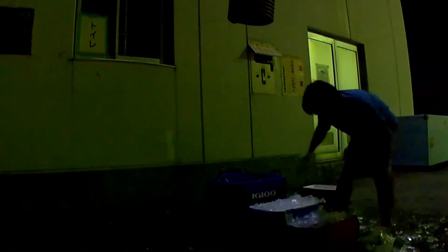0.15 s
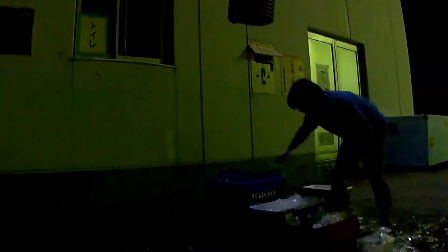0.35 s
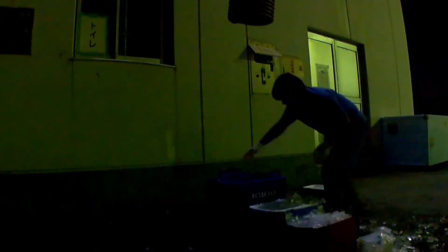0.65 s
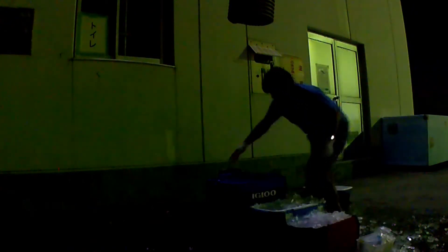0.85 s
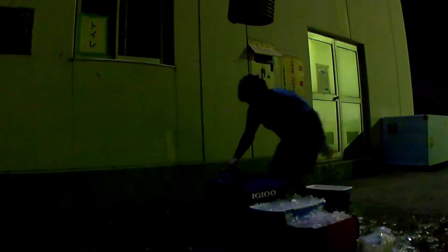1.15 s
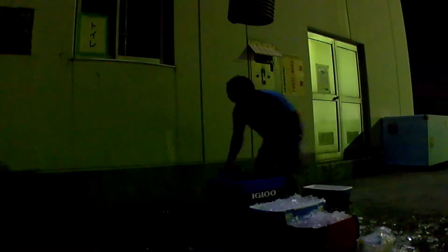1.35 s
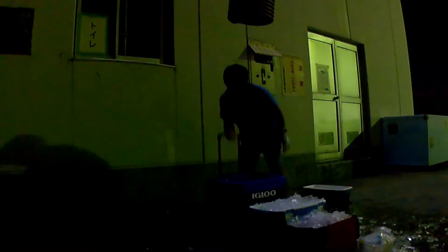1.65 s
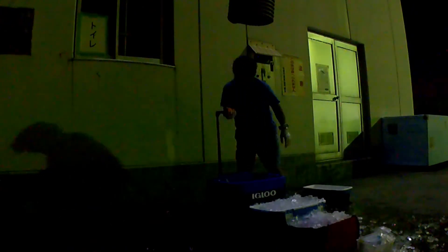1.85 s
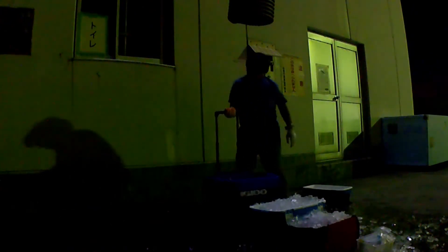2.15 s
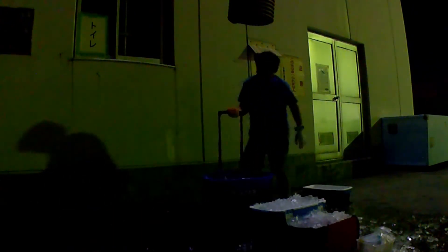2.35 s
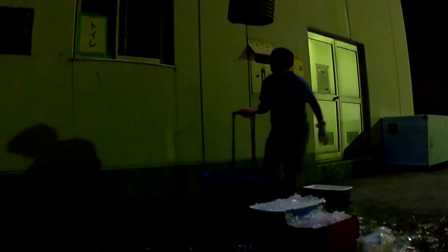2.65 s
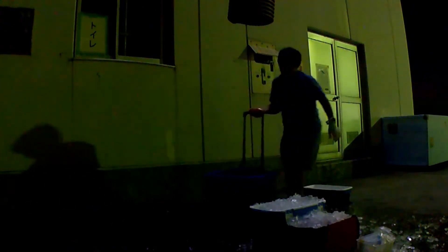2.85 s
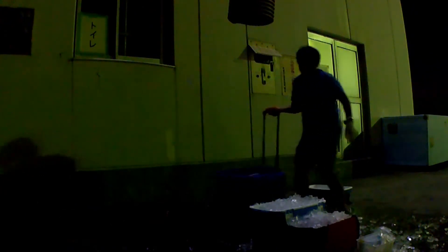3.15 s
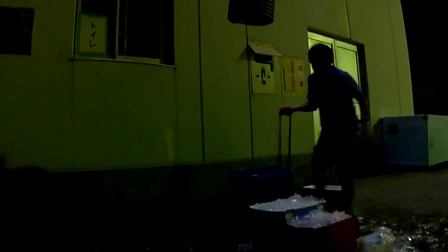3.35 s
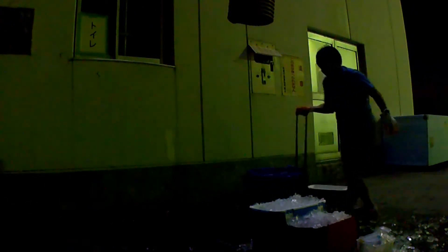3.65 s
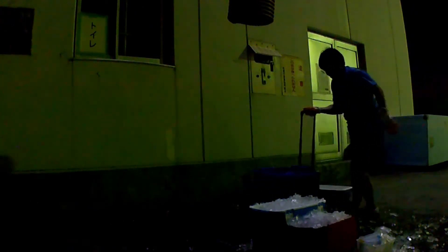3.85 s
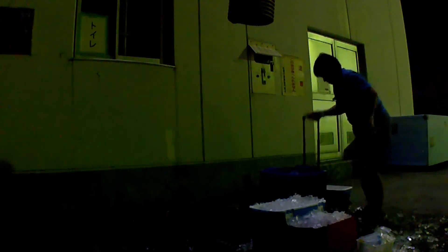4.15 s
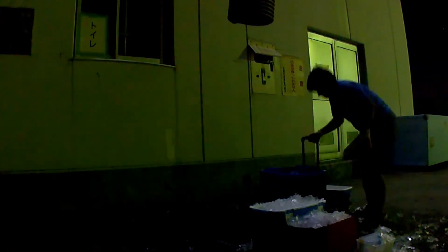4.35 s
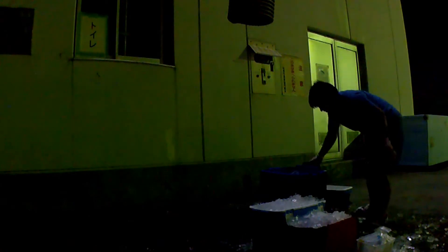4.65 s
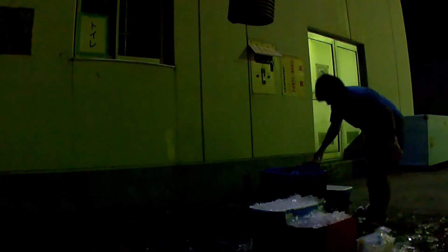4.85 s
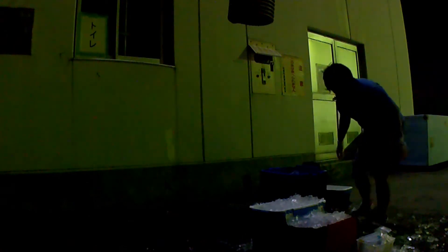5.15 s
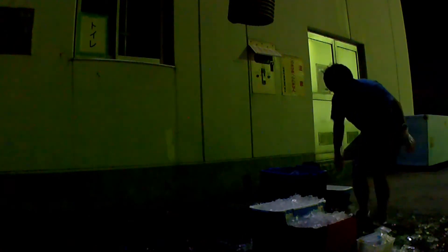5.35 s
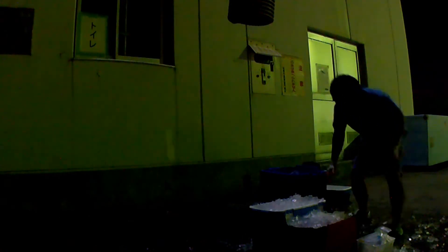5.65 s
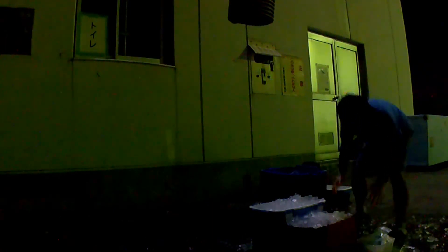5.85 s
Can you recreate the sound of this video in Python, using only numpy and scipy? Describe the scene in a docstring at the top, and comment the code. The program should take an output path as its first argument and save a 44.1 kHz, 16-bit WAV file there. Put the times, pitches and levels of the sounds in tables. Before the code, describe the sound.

A dull, steady outdoor hum lies under everything, with a thin, faint echo from a nearby wall. From 0 to 1.5 seconds there are only light gravel crunches and a soft pair of hollow plastic knocks near 0.3. At 1.7 a dull handle scrape leads into a fast cluster of clacks at 1.8, metal tubes ringing briefly. From about 2.15 to 4.2 a cooler's wheels lurch over gravel: dense stone clicks, gritty crackles, hollow knocks and low body bumps, with strong jolts near 2.4, 3.15 and 3.3. A button ticks at 4.16; the handle slams down at 4.64, the loudest hit, clacking, ringing and thumping the box. Ice clinks and slithers downward in pitch around 5.1 to 5.35, followed by a knock, another clink at 5.5 and hollow plastic knocks, strongest at 5.9, with a final gravel crunch. The close stereo pickup is slightly muffled.

```python
"""A plastic cooler's telescopic handle is yanked out and later slammed down: each stop clacks and rings its tubes.
Between the two, wheels roll over gravel: many stone clicks, with bumps that drum on the cooler's body.
Steps crunch, the handle scrapes and its button clicks, hollow plastic knocks and ice clinks: short noise bursts.
It is night in a gravel yard with a faint echo from a wall, over a dull outdoor hum of filtered noise.
A small, muffled camera listens with two microphone ports."""
import sys
import numpy as np
from scipy import signal
from scipy.fft import rfft, irfft, next_fast_len
from scipy.io import wavfile
from scipy.ndimage import map_coordinates

SR = 44100
rng = np.random.default_rng(int(sys.argv[2]) if len(sys.argv) > 2 else 0)


def file_out(sig):
    """Save sig as 16-bit WAV at sys.argv[1]."""
    # one column per channel
    cols = np.atleast_2d(sig).T
    # limit, then scale
    lim = np.clip(cols, -1, 1)
    pcm = np.round(lim * 32767).astype(np.int16)
    wavfile.write(sys.argv[1], SR, pcm)


N = 264803
T = np.arange(SR // 4) / SR  # time within one impact [s]

# balance of low and high in the sound of stones: (frequency [Hz], relative level [dB per Hz])
GRAVEL_COLOUR = [(100, -23), (350, -11), (620, -11.5), (1300, -0.5), (2400, 2), (3000, -0.5), (4000, -12.5),
                 (5000, -24.5), (6200, -33), (8500, -27.5), (10500, -34.5), (13000, -42.5), (14500, -71)]
# small impacts heard through the camera's housing: (frequency [Hz], relative level [dB])
HOUSING_COLOUR = [(40, -39), (450, 3), (2900, 1), (4000, -6), (5800, -23), (8500, -14.5), (12000, -33),
                  (14500, -35)]
# peak over average (rms) level for each kind of impact: name -> ratio [dB]
PEAK_OVER_RMS = {"clack": 24, "knock": 26.5, "clink": 26.5, "crunch": 21}


def amp(db):
    """Turn decibels into a gain."""
    return 10 ** (np.asarray(db) / 20)


def unit(x):
    """Scale x to an rms level of 1."""
    return x / np.sqrt(np.mean(x ** 2) + 1e-20)


def along(points, hz):
    """Read a curve of (frequency [Hz], value) points on a log frequency axis."""
    f, v = np.transpose(points)
    return np.interp(np.log(hz + 1), np.log(f + 1), v)


def wobble(rate):
    """Draw a smooth random curve with this many random points a second."""
    points = rng.standard_normal(int(N * rate / SR) + 4)
    return map_coordinates(points, [np.arange(N) * rate / SR])


def filtered(x, response):
    """Multiply the spectrum of x by a response that depends on frequency."""
    n = x.shape[-1]
    m = next_fast_len(n + 4096)
    return irfft(rfft(x, m) * response(np.fft.rfftfreq(m, 1 / SR)), m)[..., :n]


def colour(x, db_of_hz, size=2048):
    """Filter with the given dB curve and no sound ahead of the impact (minimum phase)."""
    gain = amp(db_of_hz(np.fft.rfftfreq(size, 1 / SR)))
    cepstrum = irfft(np.log(gain + 1e-6))
    # folding the second half onto the first makes the filter causal
    cepstrum[1:size // 2] *= 2
    cepstrum[size // 2 + 1:] = 0
    impulse = irfft(np.exp(rfft(cepstrum)))
    return signal.fftconvolve(x, impulse[None], axes=1)[:, :x.shape[1]]


def fade(t60):
    """Die away by 60 dB in t60 seconds."""
    return np.exp(-np.log(1000) * T / t60)


def ring(modes):
    """Strike damped tones with new strengths and tiny pitch changes: loose parts never ring twice alike."""
    hz, db, t60 = np.transpose(modes)
    hz = hz * (1 + .002 * rng.standard_normal(len(hz)))
    start = rng.random((len(hz), 1))
    waves = np.sin(2 * np.pi * (hz[:, None] * T + start)) * fade(t60[:, None])
    strengths = amp(db + 2 * rng.standard_normal((2, len(hz))))
    return unit(strengths @ waves)


def contact(t60, snap):
    """Make a sharp first snap and the dense rattle that follows it, as (mid, side)."""
    x = unit(rng.standard_normal((2, len(T))) * fade(t60))
    # the snap reaches the left port first
    x[:, :3] += snap * np.sqrt(len(T)) * np.array([[0, 1, 0], [.5, 0, -.5]])
    return x


def add(track, s, sound):
    """Mix a sound into the track at time s."""
    part = track[:, max(round(s * SR), 0):][:, :sound.shape[1]]
    part += sound[:, :part.shape[1]]


def thump(rise, pitch_hz=194, panel_hz=390, panel_db=-12, panel_t60=0.049):
    """The cooler's walls take a moment to swing; the panel that is pushed adds its own note."""
    # the cooler's body before retuning: (frequency [Hz], level [dB], time to fade by 60 dB [s])
    body_tones = [(141, -6, 0.02), (195.3, 4.5, 0.057), (265, 0.5, 0.028)]
    hz, db, t60 = np.transpose(body_tones + [(panel_hz, panel_db, panel_t60)])
    retune = pitch_hz / hz[1]  # moves all the notes together
    walls = amp(db) @ (np.sin(2 * np.pi * retune * hz[:, None] * T) * fade(t60[:, None]))
    swing = np.array([walls, np.roll(walls, 1) / 2]) * (1 - np.exp(-(T / rise) ** 2))
    boomy = [(25, -42), (70, -6.5), (150, -3), (600, 1), (3000, -49)]  # (frequency [Hz], level [dB])
    return unit(colour(swing, lambda hz: along(boomy, hz), size=8192))


def handle():
    """The handle hits its stops: each hit clacks, rings the tubes and shakes the box."""
    # hits: (time [s], level [dB], treble tilt [dB], box thump relative to hit [dB], thump pitch [Hz])
    stops = [(1.796, -18, -6, -8.5, 228), (1.801, -18.5, 5.5, -15, 148), (1.816, -11, 3.5, -16.5, 262),
             (1.822, -14.5, -15, -12, 157), (1.841, -13.5, -1.5, -18, 207.6),
             (4.640, -10.5, -8.5, -13, 200.5), (4.644, -6.5, -7.5, -13, 177), (4.65, -12, -3, -40, 203),
             (4.663, -25, 1, -25.5, 204)]
    # the handle's tubes: (frequency [Hz], level [dB], time to fade by 60 dB [s])
    tube_tones = [(836, 2, .08), (1353, 1.5, 0.12), (1576, 5, 0.1), (1777, -11, 0.062), (2007, 0, 0.17),
                  (2416, 0, 0.14), (2534, -9, 0.058), (3020, 5, 0.07), (3230, 4.5, 0.093), (3700, 0, 0.054)]
    # tone of the clack: (frequency [Hz], relative level [dB per Hz])
    clack_colour = [(30, -43), (110, -16), (300, 3.5), (700, -5), (1100, -4), (1600, 2), (2900, 0),
                    (4000, -13), (5600, -32), (9000, -26.5), (12000, -36), (14500, -63)]
    tilt = [(400, 0.082), (1000, -1.06), (2500, -0.05), (3700, 0.54), (6000, 0.99)]  # (Hz, share of tilt)
    out = np.zeros((2, N))
    for s, db, treble_db, thump_db, thump_hz in stops:
        tone = lambda hz: along(clack_colour, hz) + treble_db * along(tilt, hz)
        clack = unit(colour(contact(t60=0.048, snap=0.38), tone))
        tubes = unit(colour(ring(tube_tones), tone))
        hit = clack + amp(-6 - 0.19 * treble_db) * tubes
        add(out, s, amp(db - PEAK_OVER_RMS["clack"]) * hit)
        add(out, s, amp(db + thump_db - 17.0) * thump(rise=0.0025, pitch_hz=thump_hz))
    return out


def pull():
    """Effort on the wheels as a gain, next to nothing while the cooler stands."""
    # the wheels lurch on with each stride and nearly stall between: (time [s], level [dB])
    effort_curve = [(2.13, -60.5), (2.19, -41), (2.292, -37.5), (2.38, -37.5), (2.53, -38), (2.6, -43.5),
                    (2.66, -38), (2.78, -37.5), (2.87, -40.5), (2.96, -40.5), (3.01, -39.5), (3.21, -40),
                    (3.265, -43.5), (3.36, -40), (3.56, -39), (3.84, -43.5), (3.9, -38), (4.01, -40.5),
                    (4.11, -48.5), (4.3, -76)]
    return amp(np.interp(np.arange(N) / SR, *np.transpose(effort_curve), -120, -120))


def wheels():
    """Stones under the wheels drum on the cooler's body at random moments."""
    jolts = (rng.random(N) < 24 / SR) * rng.uniform(0.2, 1, N)  # about 24 a second
    body = signal.oaconvolve(jolts[None], thump(rise=0.00072), axes=1)[:, :N]
    return amp(-14.5) * pull() * unit(body)


def shuffling(rows, stir_db):
    """Pressure of the shoes on the gravel as a gain: a faint stir with a swell for each row."""
    t = np.arange(N) / SR
    swells = [amp(db) * np.exp(-((t - s) / half) ** 2 / 2) for s, db, half in rows]
    return np.hypot(amp(stir_db), np.linalg.norm(swells, axis=0))


def gravel(count=22):
    """Many stones, each with its own click and pitch, move in fits; harder grinding moves more of them."""
    # weight shifts that swell and fade: (time [s], level [dB], half length [s])
    weight_shifts = [(1.19, -57, 0.52), (2.016, -55.5, 0.27), (4.645, -51, 0.16), (5.987, -42.5, 0.1)]
    # stones never lie quite still underfoot, hence the faint stir
    force = np.hypot(pull(), shuffling(weight_shifts, stir_db=-59)) * amp(1.2 * wobble(20))
    effort = force / force.max()
    rate = 300 + 220 * effort  # clicks a second from all the stones together
    out = np.zeros((2, N))
    for _ in range(count):
        moves = rng.random(N) < rate / count / SR
        spread = (3 + 4 * effort) * np.clip(rng.standard_normal(N), -2, 1.6)
        fits = 3 * np.tanh(wobble(12))
        sizes = amp(spread - 2 * effort + fits) / np.sqrt(rate)
        pitch_hz = 2400 * np.exp(0.434 * rng.standard_normal())
        shine_db = 3 * rng.standard_normal()
        peak = lambda hz: 9 / (1 + (np.log2((hz + 1) / pitch_hz) / 0.13) ** 2)
        tint = lambda hz: peak(hz) + shine_db * (hz > 5500)
        stone = unit(colour(contact(t60=0.04, snap=0.6)[:, :SR // 20], tint))
        out += signal.oaconvolve((moves * sizes)[None], stone, axes=1)[:, :N]
    return amp(2.5) * force * unit(colour(out, lambda hz: along(GRAVEL_COLOUR, hz)))


def bumps():
    """A jolt sounds the hollow of the box and one of its panels."""
    # booms: (time [s], level [dB], panel pitch before slight retuning [Hz], panel level [dB])
    jolts = [(1.496, -43.5, 290, -18), (2.24, -34.5, 546, -11.5), (2.411, -33, 388, 9.5),
             (3.147, -30.5, 456, -4), (3.401, -40, 330, 2), (3.572, -45.5, 350, -12),
             (3.934, -39, 396, -26), (5.275, -41.5, 375, 12)]
    out = np.zeros((2, N))
    for s, db, panel_hz, panel_db in jolts:
        add(out, s, amp(db - 12.5) * thump(rise=0.0059, panel_hz=panel_hz, panel_db=panel_db))
    return out


def crunches_and_scrape(lead=.04):
    """Dense clicks build up, give way in a bright crack and settle: stones, and one scrape of the handle."""
    # stones give way under a shoe or wheel; the dull one at 1.719 is the handle scraping:
    # (time [s], level [dB], extra treble [dB], settling time [s])
    give_ways = [(0.235, -33.5, 7, 0.085), (0.457, -36, 6, 0.0094), (0.507, -35.5, 9, 0.021),
                 (0.733, -39, 6, 0.016), (0.936, -34, -7, 0.02), (1.1, -37, 8, 0.0099),
                 (1.4, -33.5, 3, 0.027), (1.719, -27, -12, 0.035), (1.756, -27, 5, 0.016),
                 (2.23, -17, 0.5, 0.015), (2.273, -24.5, 2.5, 0.042), (2.339, -25.5, 7, 0.044),
                 (2.391, -17, 0, 0.013), (2.451, -24.5, 6, 0.021), (2.475, -23, -6.5, 0.014),
                 (2.667, -25, 2, 0.034), (2.832, -24, 8, 0.0042), (2.907, -25.5, -2, 0.0056),
                 (3.042, -23.5, -1, 0.05), (3.223, -23, -7, 0.0089), (3.301, -12, -3.5, 0.029),
                 (3.318, -19, 2, 0.015), (3.543, -32, 13, 0.074), (3.68, -22.5, -5, 0.022),
                 (3.931, -22.5, -4, 0.0078), (3.944, -19.5, -5, 0.021), (4.282, -30.5, 2, 0.011),
                 (4.299, -20.5, -10, 0.017), (4.359, -31, -7, 0.022), (4.489, -32.5, -22, 0.018),
                 (4.831, -32, 2.5, 0.011), (5.635, -28.5, 0, 0.035), (5.953, -28.5, 4.5, 0.034)]
    out = np.zeros((2, N))
    first = round(lead * SR)
    since = T - T[first]  # time from the crack, negative during the build-up
    for s, db, treble_db, length in give_ways:
        tone = lambda hz: along(GRAVEL_COLOUR, hz) + treble_db * along([(2200, 0), (7000, 1)], hz)
        clicks = (rng.random(len(T)) < 1800 / SR) * amp(3.3 * rng.standard_normal(len(T)))
        clicks = clicks * rng.choice([-1, 1], len(T))
        # short ones snap almost at once; long ones build up
        rise = length * 0.62 * np.sqrt(length / 0.033)
        clicks *= np.exp(-np.abs(since / np.where(since < 0, rise, length)) ** 1.56)
        burst = signal.fftconvolve(clicks[None], contact(t60=0.053, snap=0.84), axes=1)[:, :len(T)]
        bright = lambda hz: tone(hz) + along([(2500, 3.1), (6000, 4.8)], hz)
        crack = colour(contact(t60=0.0069, snap=0.81), bright)
        add(out, s - T[first], amp(db - PEAK_OVER_RMS["crunch"]) * unit(colour(burst, tone)))
        add(out, s, amp(db - 30.5) * unit(crack))
    return out


def grit(stir_db=-70):
    """Tiny bright grains crackle under the soles, in clumps."""
    # a sole grinds fine grit, swelling and fading: (time [s], level [dB], half length [s])
    scuffs = [(2.32, -65, 0.036), (2.755, -58, 0.03), (3.135, -54, .013), (3.18, -51.5, 0.016),
              (3.382, -52.5, 0.012), (3.462, -54, 0.018), (4.01, -61, 0.044), (4.304, -50.5, 0.01)]
    # tone of the grains: (frequency [Hz], relative level [dB per Hz])
    grain_colour = [(1500, -25), (3500, 6.5), (6000, -9.5), (8000, 0), (10000, -6), (13000, -19),
                    (14500, -35)]
    grains = (rng.random((2, N)) < 2500 / SR) * rng.standard_normal((2, N))
    clumps = grains * amp(4.5 * wobble(70))
    return shuffling(scuffs, stir_db) * unit(colour(clumps, lambda hz: along(grain_colour, hz)))


def knocks():
    """Hollow plastic answers a knock with one broad, quickly damped resonance."""
    # knocks: (time [s], level [dB], centre of the resonance [Hz])
    hits = [(0.291, -25, 1190), (0.311, -23.5, 875), (2.115, -26, 1630), (2.257, -20, 1980),
            (2.415, -12.5, 1760), (3.149, -14.5, 1540), (3.197, -17.5, 1040), (3.402, -23, 1380),
            (3.621, -15.5, 1690), (3.797, -18, 1670), (4.444, -26.5, 1410), (4.525, -25, 1200),
            (4.594, -27, 2090), (4.676, -26.5, 2150), (5.275, -22, 2296), (5.365, -16.5, 1060),
            (5.604, -27.5, 1040), (5.669, -20.5, 1130), (5.774, -24, 1140), (5.898, -17.5, 1200),
            (5.914, -11.5, 1420), (5.996, -22.5, 600)]
    out = np.zeros((2, N))
    for s, db, centre_hz in hits:
        t60 = 0.1 * (centre_hz / 1200) ** 0.75  # thinner, higher parts rattle longer [s]
        resonance = lambda hz: -8 * np.log1p((np.log2((hz + 1) / centre_hz) / 0.86) ** 2)
        shell = lambda hz: along(HOUSING_COLOUR, hz) + resonance(hz)
        add(out, s, amp(db - PEAK_OVER_RMS["knock"]) * unit(colour(contact(t60, snap=0.54), shell)))
    return out


def clinks_and_button():
    """Ice, hard little pieces and the handle's button tick in one narrow band, with a gritty high ping."""
    # clinks, and the handle's button at 4.163:
    # (time [s], level [dB], pitch [Hz], high ping relative to tick, before a small boost [dB])
    pieces = [(4.163, -18.5, 2930, -32), (4.231, -30, 2400, -35), (5.117, -38, 4150, -26),
              (5.135, -33.5, 4100, -24), (5.172, -28.5, 2980, -17), (5.209, -32, 2450, -27),
              (5.229, -22, 2530, -35), (5.53, -20, 2500, -28), (5.705, -28.5, 3000, -27)]
    out = np.zeros((2, N))
    for s, db, pitch_hz, ping_db in pieces:
        band = lambda hz: -9 * np.log1p((np.log2((hz + 1) / pitch_hz) / 0.45) ** 2)
        piece = lambda hz: along(HOUSING_COLOUR, hz) + band(hz)
        high_band = lambda hz: -9 * np.log1p(((hz - 7100) / 300) ** 2)
        tick = unit(colour(contact(t60=0.15, snap=0.89), piece))
        ping = unit(colour(contact(t60=0.11, snap=.3), high_band))
        add(out, s, amp(db - PEAK_OVER_RMS["clink"]) * (tick + amp(ping_db + 0.5) * ping))
    return out


def slither(width_hz=260):
    """Ice slithers among other pieces: quick little slips excite a narrow resonance that glides down."""
    # the sinking ring: (time [s], pitch [Hz], level [dB])
    path = [(5.115, 4310, -55), (5.155, 3980, -64), (5.18, 2973, -51), (5.244, 2572, -47.5),
            (5.309, 2340, -50), (5.36, 2330, -61)]
    s, hz, db = np.transpose(path)
    t = np.arange(N) / SR
    slips = (rng.random((2, N)) < 450 / SR) * rng.standard_normal((2, N))
    rings = signal.oaconvolve(slips, np.exp(-np.pi * width_hz * T)[None], axes=1)[:, :N]
    glide = rings * np.sin(2 * np.pi * np.cumsum(np.interp(t, s, hz)) / SR)
    level = amp(np.interp(t, s, db, -120, -120))
    return level * unit(colour(glide, lambda f: along(HOUSING_COLOUR, f)))


def yard(x):
    """Echo of the yard: a thin diffuse tail of fading noise and one faint late slap from a wall."""
    # how fast the tail fades: (frequency [Hz], time to fade by 60 dB [s])
    tail_fade = [(200, 0.38), (2000, 0.24), (10000, 0.26)]
    hz, t, z = signal.stft(rng.standard_normal((2, SR // 2)), SR, nperseg=256)
    decay = np.exp(-np.log(1000) * t / along(tail_fade, hz)[:, None])
    tail = signal.istft(z * decay, SR, nperseg=256)[1]
    tail *= amp(-12.0) / np.linalg.norm(tail[0])
    tail[:, round(.075 * SR)] += amp(-33)  # the slap
    return signal.oaconvolve(x, tail, axes=1)[:, :N]


def hum():
    """Dull outdoor background: filtered noise whose level drifts slightly."""
    # tone of the background: (frequency [Hz], relative level [dB per Hz])
    air_colour = [(25, -18.5), (60, -5.5), (200, 1), (350, -2), (540, -8), (760, -3.5), (1700, -12.5),
                  (2700, -19), (4000, -31.5), (5800, -46.5), (8500, -40), (12500, -42), (14500, -62)]
    air = filtered(rng.standard_normal((2, N)), lambda hz: amp(along(air_colour, hz)))
    return amp(-46.5 + 0.28 * wobble(1.05)) * unit(air)


def ports(pair):
    """Turn (mid, side) into two microphone ports that share the bass and hear the treble apart."""
    # how alike left and right are: (frequency [Hz], likeness [0 to 1])
    likeness = [(150, 1), (850, 0.85), (1500, 0.53), (3000, 0.4), (6000, 0.17), (10000, 0)]
    # left level minus right level: (frequency [Hz], difference [dB])
    left_right = [(60, -3.5), (300, -3), (650, -7), (1400, -2.5), (2200, -2), (4500, 3.5), (12000, 3)]
    turn = lambda hz: np.arccos(np.clip(along(likeness, hz), -1, 1)) / 2
    mid, side = filtered(pair, lambda hz: np.array([np.cos(turn(hz)), np.sin(turn(hz))]))
    balance = lambda hz: amp(np.outer([.5, -.5], along(left_right, hz)))
    return filtered(np.array([mid + side, mid - side]), balance)


def scene():
    """All the handling, its echo in the yard, and the background."""
    near = handle() + wheels() + gravel() + bumps()
    near = near + crunches_and_scrape() + grit()
    near = near + knocks() + clinks_and_button() + slither()
    return ports(near + yard(near) + hum())


def record(dry):
    """The camera has a narrow notch in its treble and passes nothing above a top frequency."""
    notch_hz, width_hz, top_hz = 7950, 130, 14700
    notched = filtered(dry, lambda hz: (hz - notch_hz) / (hz - notch_hz - 1j * width_hz))
    return filtered(notched, lambda hz: hz < top_hz)


dry = scene()
out = record(dry)
file_out(out)
```